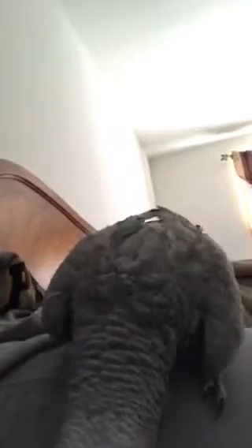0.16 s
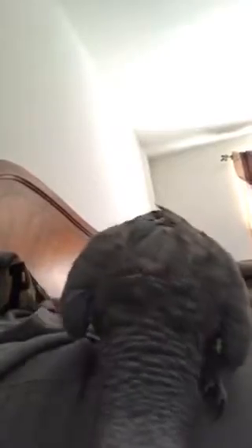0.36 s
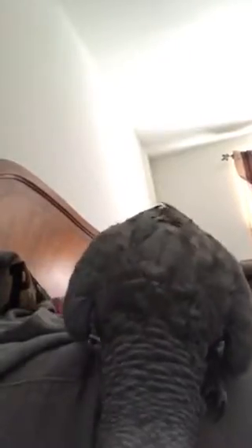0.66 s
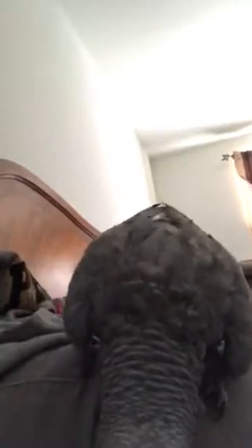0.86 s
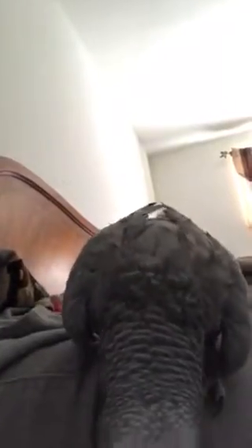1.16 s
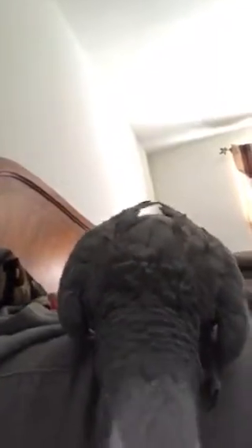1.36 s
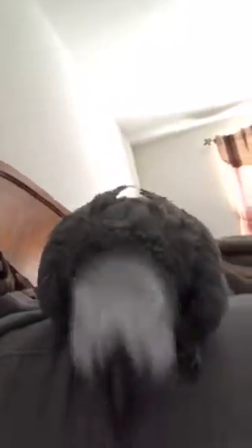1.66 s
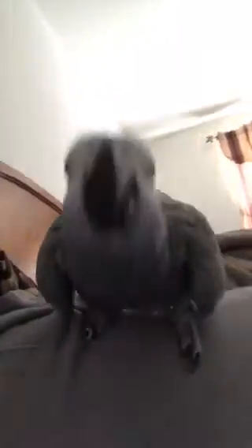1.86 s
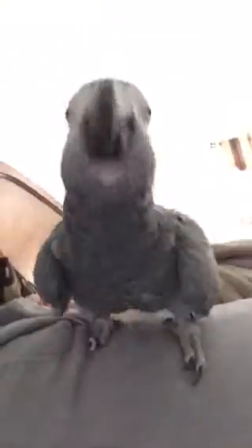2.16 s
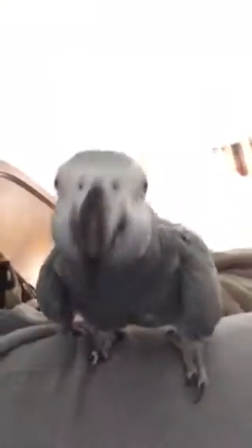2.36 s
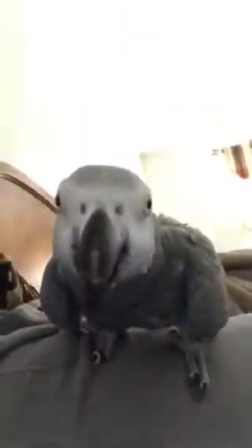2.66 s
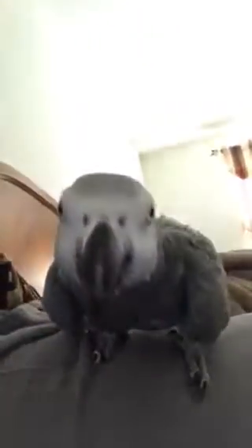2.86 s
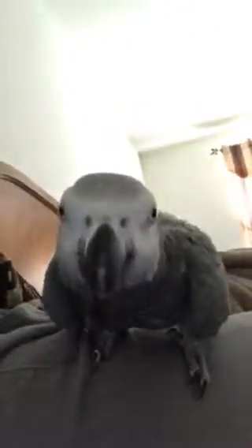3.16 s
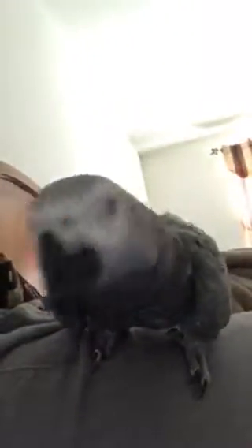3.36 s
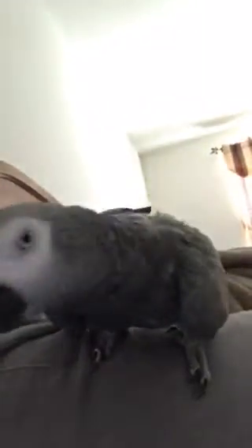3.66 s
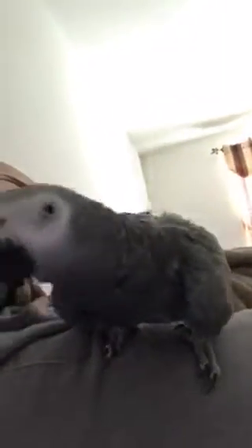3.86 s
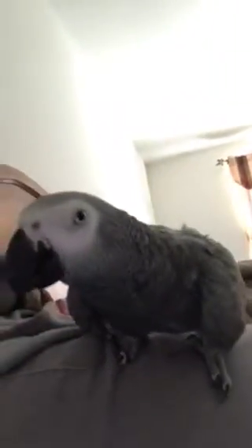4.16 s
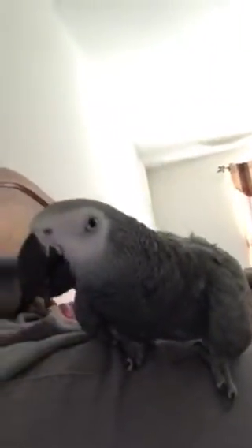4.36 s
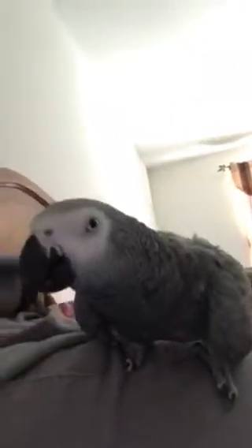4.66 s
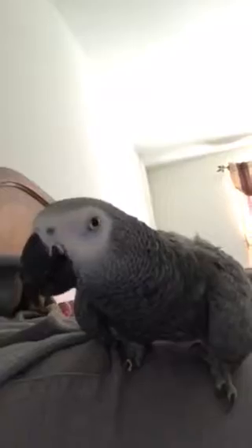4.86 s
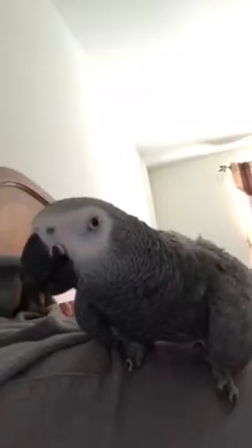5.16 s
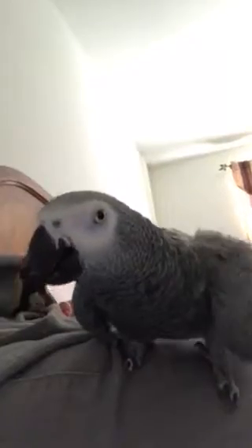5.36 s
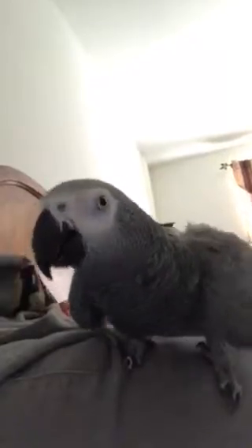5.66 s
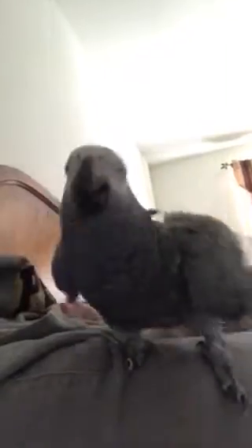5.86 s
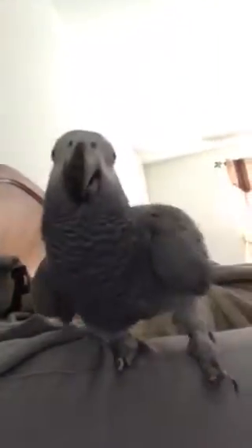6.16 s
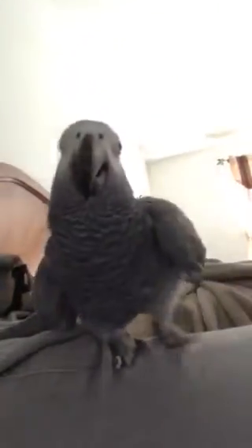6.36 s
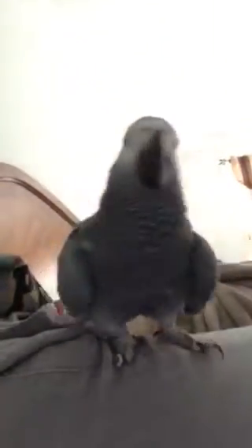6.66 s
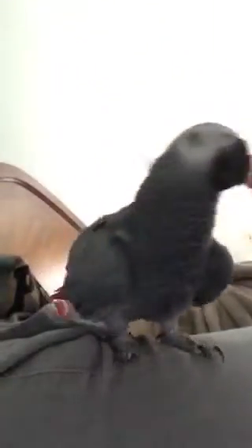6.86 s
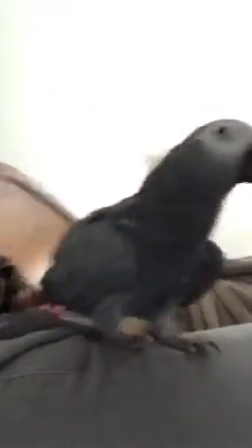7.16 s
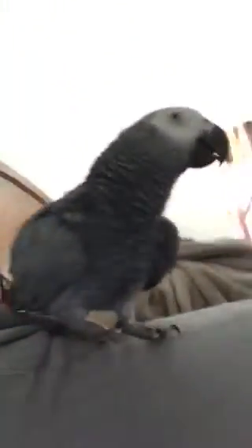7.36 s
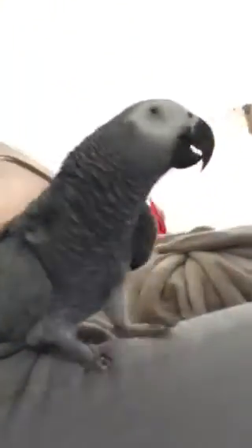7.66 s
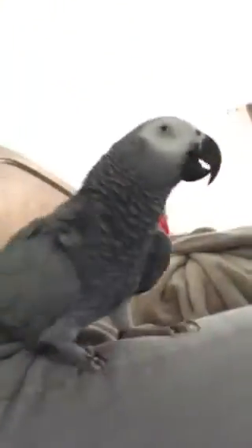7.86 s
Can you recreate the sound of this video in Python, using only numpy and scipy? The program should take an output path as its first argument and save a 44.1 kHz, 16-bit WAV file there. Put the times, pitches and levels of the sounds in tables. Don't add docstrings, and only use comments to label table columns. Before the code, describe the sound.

Close, dry mouth sounds of a parrot: small hollow pops, hard beak-tip ticks, squeaky gulps and breathy fluttering puffs, in uneven bursts with quiet gaps. A rough double-voiced squawk comes halfway, then more quick squeaks. Late on, one sharp loud squawk sweeps down and leaves a short bedroom echo before a last few soft puffs and clicks. Faint household hum and phone hiss lie underneath.

```python
import sys
import numpy as np
from scipy import signal
from scipy.fft import rfft, irfft
from scipy.io import wavfile
from scipy.ndimage import uniform_filter1d

SR = 44100
rng = np.random.default_rng(int(sys.argv[2]) if len(sys.argv) > 2 else 0)


def attenuation_scalar(level_db):
    decades = np.asarray(level_db, float) / 20
    return 10 ** decades


def log_audio(samples):
    frames = np.atleast_2d(samples).T
    limited = np.clip(frames, -1, 1)
    pcm = np.round(limited * 32767).astype(np.int16)
    wavfile.write(sys.argv[1], SR, pcm)


N = 353682


def at_hz(points, hz):
    table = np.array(points)
    return np.interp(np.log(hz), np.log(table[:, 0]), table[:, 1])


def rms_one(x):
    return x / np.sqrt(np.mean(x ** 2) + 1e-20)


def resonance(x, hz, width_hz):
    r = np.exp(-np.pi * width_hz / SR)
    feedback = [1, -2 * r * np.cos(2 * np.pi * hz / SR), r * r]
    return signal.lfilter(np.array([1, 0, -1]) * (1 - r * r) / 2, feedback, x)


def wobble(width_hz, count=N):
    r = np.exp(-2 * np.pi * width_hz / SR)
    return rms_one(signal.lfilter([1], [1, -2 * r, r * r], rng.standard_normal(count)))


def hump(u, peak_at, swell):
    peak_at = np.clip(peak_at, .05, .95)
    return np.sin(np.pi / 2 * np.interp(u, [0, peak_at, 1], [0, 1, 0])) ** swell


def spread(rows):
    s, *columns = np.transpose(rows)
    at = np.arange(round(s[0] * SR), round(s[-1] * SR))
    return at, [np.interp(at / SR, s, c) for c in columns]


CLICK_LATE_S = .001
CLICK_T = np.arange(2000) / SR
CLICK_ONSET = 1 - np.exp(-CLICK_T / .00004)


def rings(rows, fall_s, gain_db=0):
    out = np.zeros(N + 2000)
    for s, db, hz in rows:
        tone = np.sin(2 * np.pi * hz * CLICK_T) * np.exp(-CLICK_T / fall_s)
        out[round((s + CLICK_LATE_S) * SR):][:2000] += attenuation_scalar(db + gain_db) * CLICK_ONSET * tone
    return out[:N]


# pitch in Hz, level in dB.
FLOOR = [(22, -35.5), (36, 6.5), (252, -7.5), (740, -15.5), (1500, -19.5), (4080, -24), (14400, -32),
         (16000, -38.5)]
# pitch in Hz, level in dB.
HUM = [(120, -86.5), (236, -78.5)]


def floor():
    hz = np.maximum(np.fft.rfftfreq(N, 1 / SR), 1)
    rumble_cut = 1 / (1 + (36 / hz) ** 4)
    spectrum = rfft(rng.standard_normal(N)) * attenuation_scalar(at_hz(FLOOR, hz)) * rumble_cut
    hiss = rms_one(irfft(spectrum, N))
    hum = sum(attenuation_scalar(db) * rms_one(resonance(rng.standard_normal(N), hz, 32.0)) for hz, db in HUM)
    sway = attenuation_scalar(.8 * wobble(2))
    return attenuation_scalar(-68) * sway * hiss + hum


# start in seconds, peak level in dB, beak ring above it in dB,
# pitch of the mouth cavity in Hz.
CLICKS = [(0.139, -40, -8, 980), (0.209, -42.5, -28, 1040), (0.374, -35.5, -8, 398), (0.654, -34, -15, 710),
          (0.947, -44, -6.5, 376), (1.109, -44, -14, 282), (1.554, -41, -18, 460), (1.606, -44, -27, 1100),
          (1.793, -40, -9.5, 700), (1.958, -61, 13, 5630), (2.031, -41, -12, 420),
          (2.068, -39.5, -12, 3230), (2.269, -53, -5, 1560), (2.464, -41.5, 1, 1560), (2.655, -55, -2, 970),
          (2.735, -38.5, -1, 3150), (3.008, -53, 0.5, 1510), (3.281, -49, -7, 1460),
          (3.551, -45, -32, 1300), (3.739, -59, -1, 1280), (3.815, -59.5, -8, 3700),
          (4.139, -51.5, -7.5, 2670), (4.455, -35, -26, 2560), (4.772, -37.5, -44, 2530),
          (5.195, -37, -4, 1250), (5.55, -47.5, -10, 1140), (6.814, -61, 3, 4500), (6.843, -48, -11, 1090),
          (7.469, -44, -26, 1830), (7.937, -45.5, -24.5, 1190)]


def clicks(ring_db, start_hz, open_s, spread_share):
    out, t = np.zeros(N + 2000), CLICK_T
    chance = rng.standard_normal((len(CLICKS), 3))
    for (s, db, beak_db, hz), (a, b, c) in zip(CLICKS, chance):
        extra_hz = start_hz * (1 + spread_share * a)
        turns = 600 * t + extra_hz * open_s * (1 - np.exp(-t / open_s))
        pop = np.sin(2 * np.pi * turns) * np.exp(-t / 0.00096)
        cavity = np.sin(2 * np.pi * hz * t) * np.exp(-t * hz / 3.6) * np.sqrt(hz / 1000)
        beak = np.sin(2 * np.pi * 6700 * (1 + .03 * b) * t) * np.exp(-t / .00045)
        beak += .12 * np.sin(2 * np.pi * 11000 * t) * np.exp(-t / .0002)
        snap = CLICK_ONSET * (pop + attenuation_scalar(beak_db + 7) * beak)
        snap = snap - 0.41 * np.roll(snap, 14 + round(2.3 * c))
        click = snap + CLICK_ONSET * attenuation_scalar(ring_db) * cavity
        out[round((s + CLICK_LATE_S) * SR):][:2000] += attenuation_scalar(db) * click
    return out[:N]


# start in seconds, peak level in dB, pitch in Hz.
MOUTH_RINGS = [(0.1394, -45, 3000), (0.1394, -42, 900), (0.375, -40, 900), (0.21, -46, 1100),
               (0.376, -42.5, 3360), (0.6534, -46, 2250), (1.793, -40.5, 2370), (1.9597, -48.5, 3220),
               (2.2692, -59, 4140), (2.4648, -46, 4300), (2.6546, -52, 3360), (2.7343, -27.5, 3250),
               (3.0074, -49, 3070), (3.2809, -47, 3400), (3.55, -47, 3200), (4.4553, -38, 2640),
               (4.7722, -34, 2470), (5.549, -58, 4470), (6.8428, -46, 3760)]


def mouth_rings():
    return rings(MOUTH_RINGS, fall_s=0.0011, gain_db=-2.5)


# start in seconds, rise in seconds,
# fall in seconds, level in dB, top band over throat band in dB.
OPEN_PUFFS = [(0.171, 0.034, 0.0064, -57.5, 17), (0.378, 0.05, 0.025, -61, 19),
              (0.435, 0.02, 0.019, -62.5, -21), (1.49, 0.014, 0.033, -74, 15),
              (2.057, 0.013, 0.0033, -53.5, -7), (2.22, 0.011, 0.061, -71.5, 19),
              (2.761, 0.015, 0.005, -58, -10), (2.786, 0.018, 0.022, -57, -11),
              (2.822, 0.014, 0.029, -46.5, -3.5), (4.519, 0.04, 0.036, -53.5, 0.5),
              (5.19, 0.0046, 0.014, -56.5, -6), (5.602, .025, 0.008, -59, -11),
              (6.192, .029, 0.017, -51.5, -8.5), (6.353, 0.08, 0.044, -57.5, -5),
              (6.433, 0.037, 0.044, -45.5, -4.5), (7.286, 0.017, 0.046, -55.5, -10),
              (7.831, 0.046, 0.017, -64.5, -0.5), (0.14, .005, .03, -73, 15), (1.04, 0.037, .03, -75.5, 8),
              (1.15, 0.016, 0.046, -72.5, 12), (2.47, .01, 0.025, -80, 13), (5.64, 0.026, 0.022, -74, 10),
              (4.8, 0.021, .02, -73.5, 8), (4.84, .01, .03, -70, -4), (6.5, 0.023, 0.11, -76, -16),
              (6.985, 0.008, 0.096, -49, -32), (4.63, .03, .02, -72, -5)]
HALF_PUFFS = [(0.203, 0.011, 0.032, -64, -12), (1.25, 0.0082, 0.0073, -53.5, 24),
              (1.26, 0.02, 0.027, -58.5, -11), (1.585, 0.014, 0.0096, -53.5, -18),
              (1.859, 0.018, .011, -65.5, 5), (2.3, 0.045, .014, -67, 7.5),
              (3.095, 0.017, 0.025, -49.5, -7), (3.352, 0.017, 0.031, -54.5, -3),
              (3.928, 0.02, 0.03, -52, 2.5), (5.459, 0.0052, 0.0075, -62.5, 5),
              (5.707, 0.015, 0.036, -50, -12.5), (5.78, 0.03, .016, -71, -22),
              (5.879, 0.058, 0.036, -54.5, 20), (5.925, 0.026, 0.05, -57.5, -4),
              (6.122, 0.047, 0.076, -61, 21), (6.713, 0.07, 0.012, -55.5, -4.5),
              (7.525, 0.02, 0.068, -60, 11), (7.589, 0.027, 0.024, -61.5, 8), (7.713, 0.013, 0.024, -72, 1),
              (7.749, 0.046, 0.065, -66.5, 5), (4.3, .04, .12, -65, -14), (4.41, .05, .08, -67, -16),
              (0.207, .004, .03, -60, -25)]
SHUT_PUFFS = [(1.226, 0.018, 0.0042, -58, 34), (1.562, 0.029, 0.0054, -54.5, 12),
              (2.035, 0.012, 0.018, -56, 7), (2.546, 0.023, 0.015, -48.5, -4.5),
              (3.046, 0.016, 0.0083, -66, 6.5), (3.082, 0.018, 0.013, -50.5, 9.5),
              (3.314, .014, 0.013, -61.5, 7.5), (3.343, 0.021, 0.011, -45.5, 10),
              (3.604, 0.019, 0.053, -50.5, 13.5), (3.641, 0.022, 0.02, -47, 9.5),
              (3.85, 0.028, .086, -64, 15), (4.253, 0.0072, 0.025, -53.5, 1),
              (4.876, 0.026, 0.019, -61.5, 3), (5.115, 0.02, .04, -52, 28), (5.142, 0.042, .011, -48, 22),
              (5.23, 0.04, 0.034, -68, -24), (6.672, 0.036, 0.011, -53, -10),
              (6.849, 0.032, 0.035, -63, -23), (6.937, 0.0032, 0.047, -53.5, -20),
              (7.212, 0.06, 0.04, -53, 9), (7.47, 0.038, .023, -61.5, 9)]
# pitch in Hz, width in Hz, level in dB.
PUFF_MODES = [
    [(1200, 900, 1.5), (2420, 1200, -3.5), (3700, 1000, 5)],
    [(5500, 1800, 6), (6750, 1100, 9.5)],
    [(8190, 2000, -2), (11500, 2070, 5.5), (14300, 2000, -2)],
]


def puffs(flutter_db, patchy_db, swell):
    out = np.zeros(N)
    shared_flutter = .6 * wobble(150)
    postures = [(OPEN_PUFFS, -0.5), (HALF_PUFFS, -7), (SHUT_PUFFS, -18)]
    for band, modes in enumerate(PUFF_MODES):
        white, air = rng.standard_normal(N), 0
        for k, (hz, width_hz, db) in enumerate(modes):
            ringing = resonance(resonance(white, hz, width_hz), hz, width_hz * 2)
            air = air + attenuation_scalar(db + patchy_db * wobble(20)) * ringing * (-1) ** k
        power = np.zeros(N)
        for rows, beak_db in postures:
            for s, rise, fall, db, tilt_db in rows:
                length = rise + fall
                shape = hump(np.linspace(0, 1, round(length * SR)), rise / length, swell)
                colour_db = [-max(tilt_db, 0), beak_db, min(tilt_db, 0)][band]
                power[round(s * SR):][:len(shape)] += (attenuation_scalar(db + colour_db) * shape) ** 2
        flutter = attenuation_scalar(flutter_db * (shared_flutter + wobble(270)))
        out += rms_one(air * flutter) * np.sqrt(power)
    return out


def bent_calls(rows, dip, rise):
    calls = []
    for s, length, hz, db, snap_db in rows:
        u = np.linspace(0, 1, round(length * SR))
        bend = dip * min(1, 0.031 / length)
        pitch = hz * (1 + bend * (u - .5) ** 2 + rise * (u - .5))
        calls.append((s - length / 2, pitch, db, snap_db, hump(u, 0.53, 1), 0))
    return calls


# middle in seconds, length in seconds, pitch in Hz,
# level in dB, snap in dB per overtone step.
PIPS = [(0.157, 0.013, 1050, -54.5, -11), (0.172, 0.019, 672, -52, -11), (2.531, .024, 794, -52, 3),
        (2.775, 0.022, 665, -41, -3), (2.805, .024, 753, -44, 1.5), (3.629, 0.029, 395, -50, -2),
        (3.647, .022, 423, -50, 0), (4.23, 0.02, 673, -46, 3), (5.439, 0.018, 862, -48, 4),
        (5.685, .016, 826, -44, 4.5), (5.719, 0.011, 645, -43.5, -3), (5.912, 0.02, 732, -43.5, -0.5),
        (6.149, 0.019, 703, -42.5, 0.5), (6.183, 0.021, 705, -45, 1), (6.38, 0.019, 720, -44, 3),
        (6.418, 0.022, 740, -41, 2), (6.454, 0.021, 735, -42, 1), (6.695, 0.017, 830, -35, 3.5),
        (6.734, 0.02, 1050, -54, 0), (7.266, 0.025, 816, -46.5, 5), (7.514, 0.023, 714, -58.5, -4),
        (7.577, 0.02, 764, -46.5, 1)]


def pips():
    return bent_calls(PIPS, dip=1.14, rise=.18)


# start in seconds, length in seconds, from Hz, to Hz, level in dB.
GULPS = [(0.41, 0.036, 338, 293, -50.5), (1.566, 0.026, 485, 299, -47), (2.042, 0.016, 437, 290, -50.5),
         (2.538, 0.03, 854, 283, -44.5), (2.813, 0.019, 889, 480, -44), (3.075, 0.029, 1173, 480, -42),
         (3.341, 0.023, 876, 400, -45), (3.922, 0.031, 619, 258, -50), (4.257, 0.02, 493, 330, -45.5),
         (5.722, 0.011, 575, 418, -51), (5.924, 0.032, 634, 460, -53.5), (6.995, 0.061, 396, 271, -49.5),
         (7.284, 0.021, 415, 286, -58)]


def gulps():
    calls = []
    for s, length, from_hz, to_hz, db in GULPS:
        u = np.linspace(0, 1, round(length * SR))
        pitch = to_hz + (from_hz - to_hz) * np.cos(np.pi / 2 * u) ** 2
        calls.append((s, pitch, db, 0.5, hump(u, 0.88, 0.77), 0))
    return calls


# middle in seconds, length in seconds, pitch in Hz, level in dB,
# snap in dB per overtone step.
HOOKS = [(3.065, 0.023, 767, -42, 2), (3.334, 0.028, 670, -43, -0.5), (5.622, 0.014, 943, -49.5, 0.5),
         (5.631, 0.0086, 693, -50, -2), (3.915, 0.033, 536, -52.5, 0.5)]


def hooks():
    return bent_calls(HOOKS, dip=1.45, rise=0.514)


# mouth ring in dB, snap in dB per overtone step, then rows of time in seconds,
# pitch in Hz, level in dB.
WARBLES = [
    (6, 0, [(4.458, 560, -60), (4.47, 575, -54), (4.49, 590, -54), (4.518, 653, -49), (4.53, 645, -49), (4.55, 540, -52), (4.568, 459, -50), (4.574, 450, -62)]),
    (10, 0, [(4.877, 800, -60), (4.881, 760, -47), (4.89, 590, -47), (4.895, 500, -50), (4.9, 370, -46), (4.905, 310, -46), (4.909, 290, -62)]),
    (10, 1, [(5.119, 570, -62), (5.123, 540, -52), (5.13, 525, -50), (5.136, 660, -50), (5.142, 740, -51), (5.147, 750, -64)]),
    (10, 1, [(5.154, 700, -62), (5.158, 620, -53), (5.165, 540, -52), (5.174, 590, -52), (5.182, 480, -54), (5.19, 430, -64)]),
]


def warbles():
    calls = []
    for mouth_db, snap_db, rows in WARBLES:
        at, (hz, db) = spread(rows)
        pitch = uniform_filter1d(hz, size=80)
        calls.append((at[0] / SR, pitch, db.max(), snap_db, attenuation_scalar(db - db.max()), mouth_db))
    return calls


# pitch in Hz, level in dB.
THROAT = [(250, -8), (800, 3.5), (1600, -2.5), (2500, -6.5), (3500, -14.5), (5100, -28), (6800, -24.5),
          (8400, -37.5)]
# time in seconds, lift in dB.
FACING = [(0, 0), (2.54, -8), (2.77, 15), (2.84, 11), (3.06, 0), (3.6, -3), (4.3, -6), (4.5, -4), (5.2, -3),
          (5.44, -4.5), (5.63, -3), (5.69, 9.5), (5.9, 4), (6.2, 5.5), (6.45, -8), (6.7, 6.5), (7.3, -6),
          (7.6, -6.5)]
# pitch in Hz, width in Hz.
BEAK_RINGS = [(3500, 650), (6800, 970)]


def squeaks(brighten, jitter, lag):
    out, unsteady = np.zeros(N), wobble(250)
    k = np.arange(1, 13)[:, None]
    mouth_hz, mouth_width_hz = 2200, 500
    for s, hz, db, snap_db, shape, mouth_db in pips() + hooks() + gulps() + warbles():
        at = round(s * SR) + np.arange(len(hz))
        hz = hz * (1 + jitter * unsteady[at])
        phase = 2 * np.pi * np.cumsum(hz) / SR
        loudness_db = 20 * np.log10(shape + 0.0011)
        step_db = snap_db + brighten * loudness_db - 42.3 * np.clip(np.log2(450 / hz), 0, 2)
        beak = sum(np.exp(-((k * hz - ring_hz) / width_hz) ** 2) for ring_hz, width_hz in BEAK_RINGS)
        facing_db = np.interp(s, *np.transpose(FACING))
        gains = attenuation_scalar(at_hz(THROAT, k * hz) + step_db * np.sqrt(k - 1) + facing_db * beak)
        if mouth_db:
            mouth = np.exp(-((k * hz - mouth_hz) / mouth_width_hz) ** 2)
            top_loss_db = -4 * np.maximum(k * hz - mouth_hz, 0) / 1000
            gains *= attenuation_scalar(mouth_db * mouth + top_loss_db)
            phase = phase + .12 * unsteady[N - at]
        gains /= np.sqrt((gains[:3] ** 2).sum(axis=0) / 2)
        stack = (gains * np.cos(k * phase - lag * np.sqrt(k))).sum(axis=0)
        out[at] += attenuation_scalar(db) * shape * stack
    return out


# start in seconds, peak level in dB, pitch in Hz.
TICKS = [(1.1025, -50, 11500), (1.1025, -51, 6800), (1.107, -43.5, 9000), (1.779, -55, 5000),
         (1.972, -59, 6200), (2.362, -53, 6000), (2.394, -56, 14000), (1.958, -41, 5700), (2.6, -57, 6000),
         (0.209, -37, 1600), (2.7265, -54, 6500), (2.7265, -60, 3500), (3.245, -59, 11000),
         (3.288, -55, 10000), (3.57, -53, 5500), (3.584, -52, 5000), (6.843, -57, 14000),
         (2.362, -53, 11600), (2.385, -44, 14700), (2.4187, -48.5, 5070), (3.584, -46, 13300),
         (4.841, -56, 5860), (4.841, -56, 10500), (5.0923, -42, 14300), (4.4553, -37, 5200),
         (4.322, -54, 6000), (4.669, -56, 3500), (5.095, -52, 8500), (5.1945, -42, 2100),
         (5.4944, -42, 13400)]


def ticks():
    return rings(TICKS, fall_s=0.00038)


# start in seconds, length in seconds, from Hz, to Hz,
# level in dB.
WHISTLES = [(0.436, 0.12, 5350, 5230, -76), (0.476, 0.064, 8780, 8740, -75), (.49, .012, 13800, 13300, -66),
            (1.113, .006, 15300, 14500, -64), (1.114, .006, 11800, 11300, -66),
            (1.12, .01, 9200, 9000, -66), (1.235, .006, 14000, 14400, -60),
            (1.248, .011, 13000, 12100, -56), (1.799, 0.0097, 11400, 11200, -64),
            (2.108, .04, 8050, 8000, -80), (2.302, 0.035, 4900, 4750, -70),
            (6.286, 0.055, 14000, 13950, -72), (1.128, 0.013, 12000, 11000, -63),
            (1.183, 0.013, 11500, 12800, -66), (1.23, 0.014, 13000, 15300, -60),
            (1.233, 0.013, 9800, 9500, -55), (1.231, 0.011, 7470, 7960, -54),
            (1.254, 0.015, 12000, 9200, -40.5), (1.264, 0.0082, 9000, 6060, -48.5),
            (6.283, 0.063, 9100, 9050, -77), (6.495, 0.12, 9200, 9250, -79), (6.8, 0.082, 9250, 9250, -77)]


def whistles():
    out = np.zeros(N)
    for s, length, start_hz, end_hz, db in WHISTLES:
        hz = np.linspace(start_hz, end_hz, round(length * SR))
        level = attenuation_scalar(db + 3.8 * wobble(60, len(hz))) * np.hanning(len(hz)) ** 0.76
        out[round(s * SR):][:len(hz)] += level * np.sin(2 * np.pi * np.cumsum(hz) / SR)
    return out


# overtones in dB, direct sound in dB, pitch jitter as a share, then rows of
# time in seconds, pitch in Hz, level in dB. The first call uses both sides of the voice organ.
SQUAWKS = [
    (-13, -5, .018, [(4.272, 1995, -53), (4.29, 1940, -55), (4.312, 1823, -46.5), (4.33, 2256, -50.5), (4.355, 2150, -64)]),
    (-23, -5, .03, [(4.4, 2150, -61), (4.43, 2030, -51), (4.47, 2197, -56), (4.51, 2150, -58)]),
    (-26, 1, .024, [(4.325, 2210, -62), (4.348, 2700, -48), (4.37, 2725, -50), (4.39, 2680, -59), (4.42, 2500, -58), (4.455, 2660, -54), (4.49, 2707, -56), (4.535, 2560, -61), (4.57, 2360, -70)]),
    (0.5, -1.5, 0.016, [(6.965, 1900, -46), (6.971, 2340, -32), (6.978, 2480, -26), (6.995, 2450, -27.5), (7.03, 2200, -27), (7.052, 2020, -30), (7.074, 1925, -33.5), (7.1, 1931, -31), (7.135, 1864, -57.5)]),
]
# pitch in Hz, level in dB.
GAPE = [(1900, 2), (2500, 2), (4000, 9), (4900, 6), (6000, -2), (9000, -4), (12000, -11), (14500, -31)]


def squawks(rough, breath_db, press_db):
    out, direct = np.zeros((2, N))
    rasp_hz = 3400
    for overtone_db, direct_db, jitter, rows in SQUAWKS:
        at, (hz, db) = spread(rows)
        count, t = len(at), (at - at[0]) / SR
        strain = np.interp(at, at[[0, count // 2, -1]], [.25, 1.3, 1.2])
        unsteady, beat = strain * wobble(220, count), strain * wobble(90, count)
        slack_db = press_db * np.exp(-t / .022)
        blur = .14 * strain * wobble(350, count)
        pitch = uniform_filter1d(hz, size=150) * (1 + jitter * unsteady)
        phase = 2 * np.pi * np.cumsum(pitch) / SR
        tone = 0
        for k in range(1, 8):
            gain = attenuation_scalar(at_hz(GAPE, k * hz) + (overtone_db - slack_db) * np.sqrt(k - 1))
            tone = tone + gain * np.sin(k * phase + (k - 1) * blur) * (k * hz < 16000)
        rasp = resonance(resonance(rng.standard_normal(count), rasp_hz, 450), rasp_hz, 700)
        tone = tone + attenuation_scalar(overtone_db - 19) * strain ** 2 * rms_one(rasp)
        level = np.minimum(t / .004, 1) * attenuation_scalar(db + rough * jitter * beat)
        call = level * tone * (1 + attenuation_scalar(breath_db) * wobble(910, count))
        out[at] += call
        direct[at] += attenuation_scalar(direct_db) * call
    high_pass = signal.butter(8, 1840, "high", fs=SR, output="sos")
    return signal.sosfilt(high_pass, [out, direct])


# pitch in Hz, time to fall by 60 dB in seconds.
ROOM_T60 = [(2200, 0.49), (4000, 0.5), (8000, 0.45), (14000, 0.24)]


def bedroom(x):
    t, tail = np.arange(30000) / SR, 0
    edges = [300, 2000, 3200, 5000, 7500, 11000, 17000]
    white = rng.standard_normal(30000)
    for low, high in zip(edges, edges[1:]):
        band_pass = signal.butter(2, [low, high], "band", fs=SR, output="sos")
        fall = attenuation_scalar(-60 * t / at_hz(ROOM_T60, np.sqrt(low * high)))
        tail = tail + signal.sosfilt(band_pass, white) * fall
    tail = tail * (1 + 2.67 * np.exp(-t / 0.03)) * np.clip((t - .004) / 0.0031, 0, 1)
    return signal.fftconvolve(x, tail / np.sqrt(np.sum(tail ** 2)))[:N]


def scene():
    near = clicks(ring_db=-8.5, start_hz=4520, open_s=0.000403, spread_share=.12)
    near = near + mouth_rings() + ticks()
    near = near + puffs(flutter_db=1.8, patchy_db=3.0, swell=1.0)
    near = near + squeaks(brighten=0.11, jitter=0.0083, lag=1.54) + whistles()
    loud, direct = squawks(rough=85, breath_db=-24, press_db=7.0)
    return (near + direct + bedroom(loud + attenuation_scalar(-25.5) * near) + floor())[None]


def band_limit(x):
    return signal.sosfilt(signal.butter(12, 16480, fs=SR, output="sos"), x)


def record(dry):
    dips = dry - .35 * resonance(dry, 5100, 400) - .55 * resonance(dry, 10300, 800)
    return band_limit(dips)


dry = scene()
out = record(dry)
log_audio(out)
```